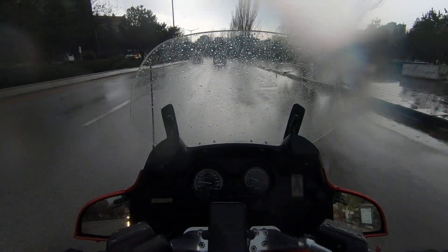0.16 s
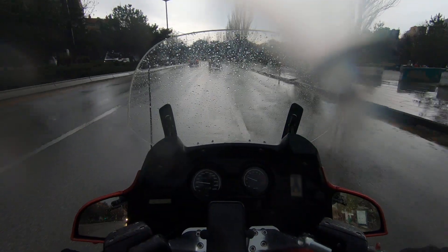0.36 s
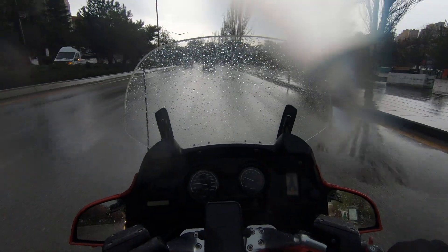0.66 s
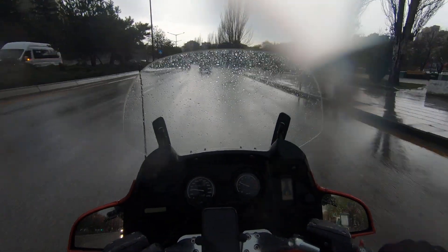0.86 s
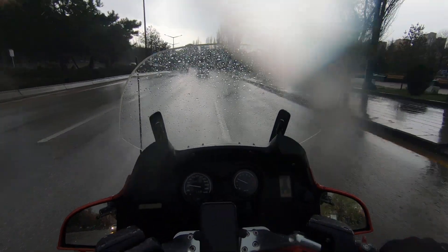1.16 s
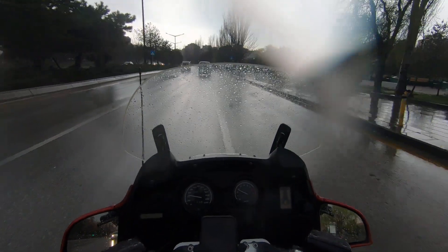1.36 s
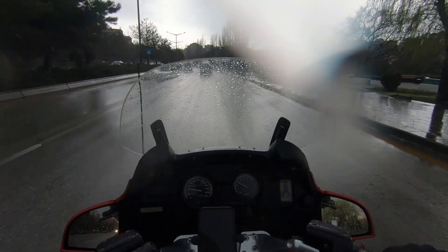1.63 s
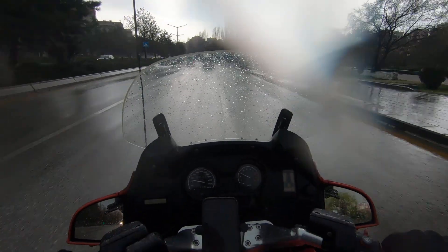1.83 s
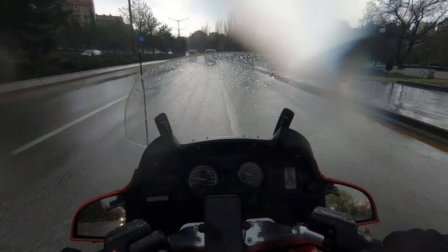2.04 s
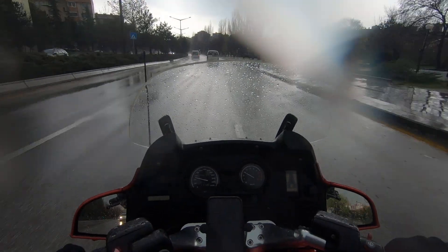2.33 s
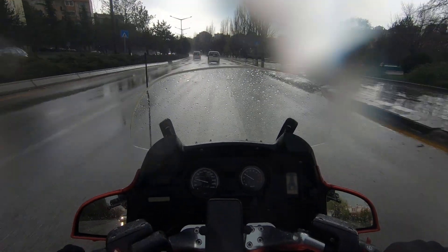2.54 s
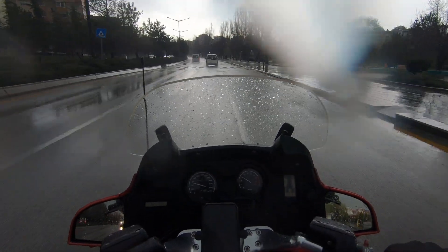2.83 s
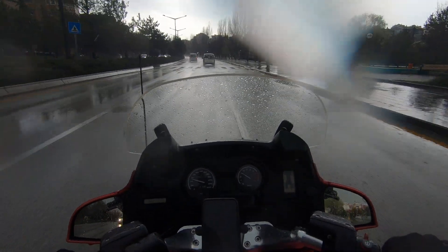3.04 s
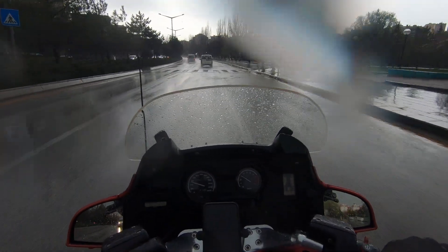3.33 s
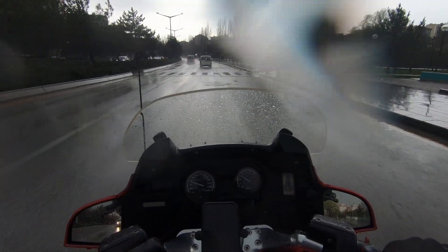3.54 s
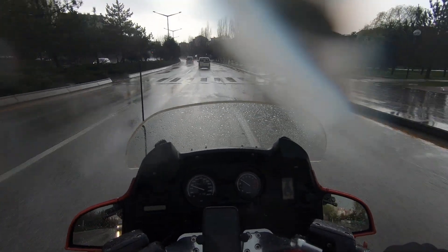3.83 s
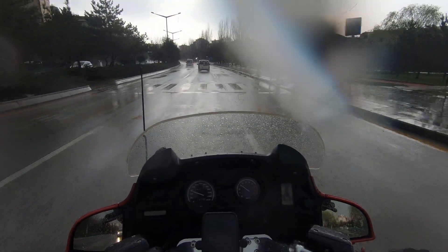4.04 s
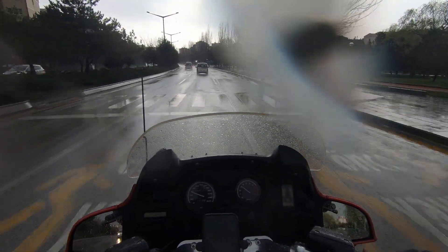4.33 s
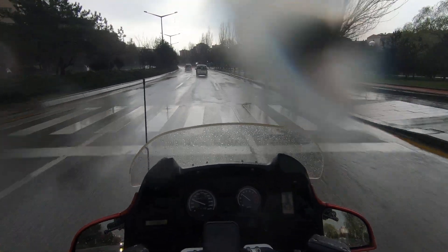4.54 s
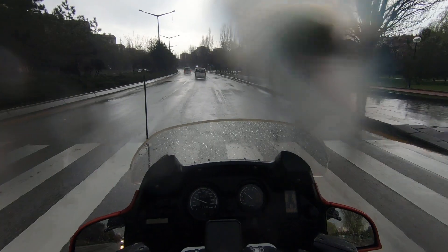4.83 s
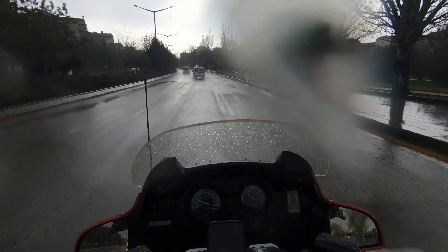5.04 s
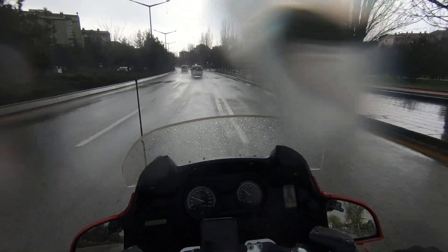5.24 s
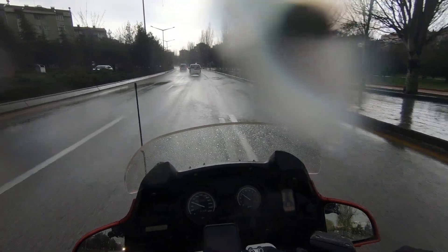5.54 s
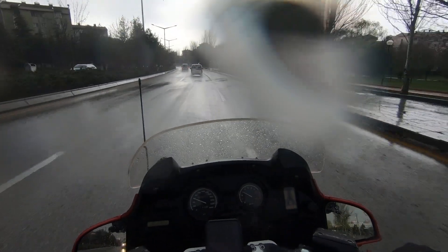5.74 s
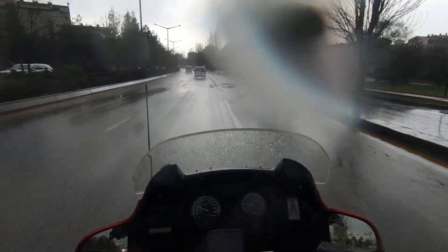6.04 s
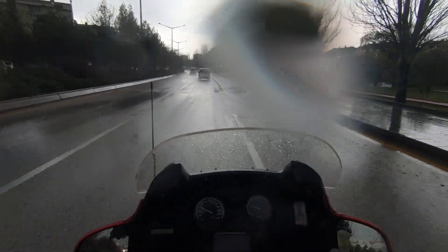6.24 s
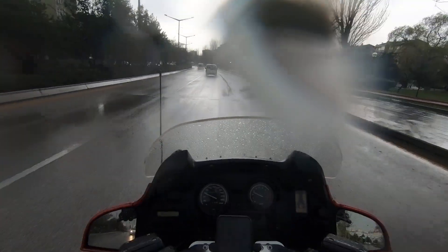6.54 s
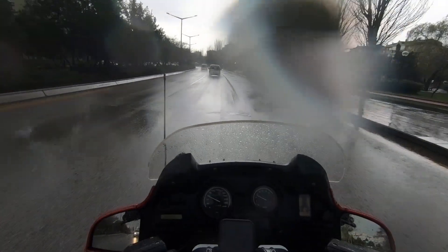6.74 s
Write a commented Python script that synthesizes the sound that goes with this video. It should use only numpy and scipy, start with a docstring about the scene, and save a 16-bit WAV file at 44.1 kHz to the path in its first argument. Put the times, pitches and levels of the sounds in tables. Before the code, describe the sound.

Outdoors on a rain-soaked street, heard from a motorcyclist's camera. Bassy gusts thump, flap and rasp right on the microphone, first in irregular knocks with small gaps, later as a steady rumble with hard slaps. A steady engine drone climbs slightly in pitch under it, with thin gear whine and wet tyre hiss. Small drops click sharply; a few fat ones knock dully on plastic. Water swishes twice near the middle.

```python
"""Wind buffets the microphone of a camera on a touring motorcyclist, in separate gusts, then steadily.
The windscreen is lowering on a rain-soaked road: eddies thump, flap and tear as shaped noise and single kicks.
Behind the wind the engine hums on firing pulses, gathering speed gently, and the gears whine as sine tones.
The tyres hiss through the water as filtered noise, with two swells of thrown standing water.
On the camera itself raindrops tick, as rings of its housing, and fat ones knock on plastic nearby."""
import sys
import numpy as np
from scipy import signal
from scipy.fft import rfft, irfft, next_fast_len
from scipy.io import wavfile
from scipy.ndimage import uniform_filter1d

SR = 44100
rng = np.random.default_rng(int(sys.argv[2]) if len(sys.argv) > 2 else 0)


def unload_wav(signal):
    """Save mono or channel-first audio to the path in sys.argv[1] as 16-bit WAV at rate SR, clipped to [-1, 1]."""
    wavfile.write(
        sys.argv[1],
        SR,
        np.round(np.clip(np.atleast_2d(signal).T, -1, 1) * 32767).astype(np.int16),
    )


N = 303252
TIME = np.arange(N) / SR  # seconds


def undb(db):
    """Decibels to gain."""
    return 10 ** (np.asarray(db) / 20)


def unit(x):
    """Scale to an rms of one."""
    return x / np.sqrt(np.mean(x ** 2))


def curves(table):
    """The columns of a table, joined by straight lines in time."""
    s, *columns = np.transpose(table)
    return [np.interp(TIME, s, column) for column in columns]


def colour(x, points):
    """Causal minimum-phase filter with the given (frequency [Hz], level [dB]) response."""
    size = next_fast_len(N + SR // 2, True)
    hz, db = np.transpose(points)
    bin_hz = np.fft.rfftfreq(size, 1 / SR) + 1  # the added 1 Hz avoids log(0)
    log_gain = np.log(undb(np.interp(np.log(bin_hz), np.log(hz), db)))
    # folding the cepstrum onto positive times makes the filter causal
    cepstrum = irfft(log_gain, size)
    cepstrum[1:size // 2] *= 2
    cepstrum[size // 2 + 1:] = 0
    response = np.exp(rfft(cepstrum))
    return irfft(rfft(x, size) * response, size)[:N]


def walk(rate):
    """Smooth random curve of rms one that changes about rate times a second."""
    grid_hz, size = 2000, 16384
    hz = np.fft.rfftfreq(size, 1 / grid_hz)
    slow = irfft(rfft(rng.standard_normal(size)) / (1 + (2 * hz / rate) ** 2))
    return unit(np.interp(TIME, np.arange(len(slow)) / grid_hz, slow))


def patter(rate, spread_db):
    """Impulses of either sign at random moments, rate a second on average, uneven in size."""
    hit = rng.random(N) < rate / SR
    sign = np.sign(rng.standard_normal(N))
    size_db = spread_db * np.clip(rng.standard_normal(N), -2, 2)
    return hit * sign * undb(size_db)


def even(x, span_s):
    """Hold the rms over span_s near one, keeping the faster flutter."""
    size = max(int(span_s * SR), 2)
    power = uniform_filter1d(uniform_filter1d(x ** 2, size), size)
    return x / np.sqrt(power + 1e-12)


def add(track, s, sound):
    """Mix a short sound into a track at s seconds."""
    part = track[int(s * SR):][:len(sound)]
    part += sound[:len(part)]


def gust(start_s, length_s, attack_s=0.013, sag_db_per_s=21):
    """A gust swells quickly, sags while it covers the microphone, then dies away, the long ones more slowly."""
    first = int(start_s * SR)
    span = slice(max(first - SR // 20, 0), first + SR // 2)
    age = TIME[span] - start_s
    rise = np.clip(age / attack_s + .5, 0, 1)
    sag = undb(sag_db_per_s * (length_s / 2 - np.clip(age, 0, length_s)))  # 0 dB at mid-gust
    release_s = 0.0058 + 0.14 * length_s
    return span, rise * sag * np.exp(-np.maximum(age - length_s, 0) / release_s)


# steady air past the microphone, before wind()'s trims:
# (time [s], buffeting level [dB], flapping level [dB], tearing level [dB])
STEADY_FLOW = [(0, -26, -31.5, -43.5), (.3, -28, -42.5, -65), (.65, -38, -41.5, -50),
               (1.0, -27.5, -35, -37), (1.2, -30, -38, -46), (1.72, -26, -35, -41.5), (2.2, -27, -29, -45),
               (2.45, -22.5, -29.5, -44.5), (2.7, -25, -30, -41.5), (2.88, -25.5, -27, -38),
               (3.1, -21, -26, -35.5), (3.5, -19.5, -24.5, -40.5), (3.82, -20, -29.5, -44.5),
               (4.05, -27, -29, -32), (4.2, -21.5, -27.5, -32.5), (4.35, -23, -24.5, -32.5),
               (4.55, -25, -28, -32), (5.05, -23.5, -26.5, -33.5), (5.33, -21, -26.5, -31.5),
               (5.75, -22.5, -29, -33.5), (6.03, -25, -28.5, -36), (6.43, -21.5, -28.5, -33.5),
               (6.62, -19.5, -29.5, -32), (6.88, -19.5, -30, -33)]
# gusts round the windscreen, before the same trims:
# (start [s], length [s], thump level [dB], tearing level [dB])
SCREEN_GUSTS = [(0.166, 0.013, -18, -36), (0.461, 0.068, -17, -38.5), (0.735, 0.074, -20, -34.5),
                (0.827, 0.021, -14, -29.5), (0.879, 0.016, -15.5, -34), (0.928, 0.054, -20, -43),
                (0.972, 0.019, -18.5, -31), (1.073, 0.013, -15, -50), (1.217, 0.041, -19, -64),
                (1.36, 0.042, -20, -34.5), (1.419, 0.059, -22, -28), (1.502, 0.026, -21.5, -31.5),
                (1.622, 0.049, -23, -44), (1.777, 0.044, -17.5, -35.5), (1.895, 0.045, -22, -36),
                (2.042, 0.14, -21, -39.5), (2.114, 0.014, -28, -38), (2.161, 0.09, -21.5, -38.5),
                (2.332, 0.02, -22.5, -36), (2.721, 0.0069, -17.5, -43), (3.926, 0.022, -20.5, -31.5),
                (4.256, 0.16, -24, -51), (4.773, 0.077, -22, -31.5), (4.896, 0.0055, -33, -27.5),
                (5.148, 0.075, -34, -27.5), (5.213, 0.05, -21, -29), (5.395, 0.03, -23, -30),
                (5.79, 0.043, -19.5, -52), (5.832, 0.032, -23, -32), (6.176, 0.11, -23.5, -34),
                (6.497, 0.02, -40, -34)]
# brief changes of the wind's level, nearly all of them lulls: (middle [s], length [s], level change [dB])
LEVEL_CHANGES = [(0.324, 0.062, -3), (0.813, 0.036, -5.5), (0.956, 0.048, -4), (1.192, 0.098, -3.5),
                 (1.726, 0.064, -9), (2.446, .07, -2), (2.552, 0.031, -5), (2.874, 0.046, -1.5),
                 (3.278, .06, -6.5), (4.091, 0.064, -2), (4.569, .06, -4), (5.063, 0.046, -3.5),
                 (5.548, 0.099, -0.5), (5.774, 0.037, -5), (6.032, 0.069, -2), (6.37, 0.033, -2.5),
                 (6.442, 0.1, -4), (6.819, 0.026, 0.5)]


def airflow(flap_share=0.33, flap_offset_db=-0.5, tearing_change=1.5):
    """Levels in dB of large, middling and small eddies: steady flow plus gust power, then brief level changes."""
    power = undb(curves(STEADY_FLOW)) ** 2
    for s, length_s, thump_db, tear_db in SCREEN_GUSTS:
        span, shape = gust(s, length_s)
        # a gust's flapping is set by its thump and its tearing
        flap_db = thump_db + flap_share * (tear_db - thump_db) + flap_offset_db
        power[:, span] += np.outer(undb([thump_db, flap_db, tear_db]), shape) ** 2
    change_db = np.zeros(N)
    for s, length_s, db in LEVEL_CHANGES:
        add(change_db, s - length_s / 2, db * signal.windows.tukey(int(length_s * SR), .7))
    # the small eddies change tearing_change times as much, in dB
    return 10 * np.log10(power) + np.outer([1, 1, tearing_change], change_db)


# spectrum of the large eddies, which thump: (frequency [Hz], relative level [dB per Hz])
THUMP_SPECTRUM = [(12, -18.5), (28, -1), (52, 4), (90, 4), (140, -2.5), (200, -16), (400, -39), (800, -84)]
# spectrum of the middling eddies, which flap: (frequency [Hz], relative level [dB per Hz])
FLAP_SPECTRUM = [(60, -26.5), (110, 0), (160, 0.5), (240, -2), (330, -9.5), (480, -21), (900, -51),
                 (2000, -85)]
# spectrum of the small eddies, which tear: (frequency [Hz], relative level [dB per Hz])
TEAR_SPECTRUM = [(120, -21), (250, 2), (370, 4.5), (500, 1.5), (800, -5.5), (1200, -13), (1800, -22.5),
                 (2800, -43.5), (4500, -41), (6000, -60.5), (10000, -79)]
# extra edge of the fastest air: (frequency [Hz], relative level [dB per Hz])
EDGE_SPECTRUM = [(400, -31), (900, 14), (1500, 5), (2000, -4), (3000, -13.5), (4600, -23), (6000, -40.5),
                 (10000, -58)]


def wind(edge_db=-13, gust_db=-30, edge_growth=2.6):
    """Large eddies thump the microphone; smaller ones flap and tear past in bursts that ride on the thumps."""
    buffet_db, flap_db, tearing_db = airflow()
    flutter = walk(66)
    eddies = unit(patter(900, 1.3)) * undb(1.5 * flutter)
    buffet = even(colour(eddies, THUMP_SPECTRUM), 0.035)
    middling = unit(patter(450, 4.2)) * undb(2.9 * flutter)
    flap = even(colour(middling, FLAP_SPECTRUM), 0.1)

    # push follows the short-term strength of the larger eddies
    push = np.sqrt(uniform_filter1d(buffet ** 2 + flap ** 2, SR // 250) + .5)
    grains = unit(patter(2500, 4.6)) + 0.48 * rng.standard_normal(N)
    small = grains * undb(1.4 * flutter) * push ** 0.52
    tearing = even(colour(small, TEAR_SPECTRUM), 0.029)

    # faster air sheds finer eddies, so gusts are brighter as well as louder
    fine = rng.standard_normal(N) * undb(3.7 * flutter) * push
    edge = even(colour(fine, EDGE_SPECTRUM), 0.07)
    edge *= undb(gust_db + edge_db + edge_growth * (tearing_db - gust_db))
    large = buffet * undb(buffet_db + 1.5) + flap * undb(flap_db + 3.0)
    return large + tearing * undb(tearing_db + 3.5) + edge


# engine speed: (time [s], firing rate [Hz], gear whine level [dB], exhaust hum level [dB])
ENGINE_SPEED = [(0, 86.9, -56, -33.5), (.6, 89.28, -47, -35.5), (1.2, 93.28, -44, -37.5),
                (1.55, 95.33, -41.5, -33.5), (2.0, 97.96, -45, -35), (2.4, 99.47, -48, -38.5),
                (3, 104.4, -46, -32), (3.35, 106.3, -40.5, -36), (3.75, 108, -40.5, -39),
                (4.05, 108.9, -44.5, -33), (4.45, 110.3, -42, -38), (4.8, 113, -53, -36.5),
                (5.5, 113.6, -57.5, -27), (6.88, 118.2, -57.5, -36)]
# exhaust note: (frequency [Hz], relative level [dB])
EXHAUST_NOTE = [(30, -17), (60, -4), (90, 12.5), (175, -21.5), (270, -19.5), (420, -14), (650, -43.5),
                (1100, -23.5), (2000, -66.5), (5000, -83.5)]
# gear tones: (multiple of the firing rate, level against the gear whine [dB])
GEAR_TONES = [(7.27, -7), (10.82, -12), (12.56, -3), (12.77, -11), (25.12, -26.5)]
# drone of the crankcase and valve train: (multiple of the firing rate, peak level before wavering [dB])
CRANKCASE_DRONE = [(3, -43), (3.5, -46.5), (4, -47), (4.5, -48), (5, -48.5), (6, -54), (8, -54.5),
                   (12, -54.5), (16, -60), (25.5, -69)]


def engine(waver_db=0.9):
    """Even firings hum through the exhaust; the crankcase drones and the gears sing at fixed multiples of them."""
    firing_hz, whine_db, hum_db = curves(ENGINE_SPEED)
    turns = np.cumsum(firing_hz * (1 + 0.00077 * walk(23))) / SR  # firings so far
    pulses = np.diff(np.floor(turns), prepend=0) * undb(1.4 * walk(120))

    def tones(table):
        """Moving air between the engine and the microphone makes each tone waver."""
        total = np.zeros(N)
        for multiple, db in table:
            gain = undb(db + waver_db * walk(22))
            total += gain * np.sin(2 * np.pi * multiple * turns + .15 * walk(40))
        return total

    hum = undb(hum_db) * unit(colour(pulses, EXHAUST_NOTE))
    return hum + undb(whine_db) * tones(GEAR_TONES) + tones(CRANKCASE_DRONE)


# upper sizzle of the tyre spray, before a half-decibel lift: (time [s], level [dB])
SIZZLE_LEVEL = [(0, -56.5), (.35, -56.5), (.65, -58), (1.35, -59), (1.6, -56), (2.1, -58), (2.8, -59),
                (3.1, -56.5), (3.45, -58), (3.65, -60), (4.4, -59), (5, -56.5), (5.53, -57.5), (6.05, -59),
                (6.3, -58.5), (6.88, -56)]
# lower roar of the tyres on the wet road, on the scale of the sizzle's rms: (time [s], level [dB])
ROAR_LEVEL = [(0, -51.5), (.6, -49.5), (1, -50), (1.8, -51.5), (2.5, -55.5), (3.4, -51.5), (4.5, -53),
              (6.88, -57.5)]
# wet tyre hiss as it reaches the sealed microphone: (frequency [Hz], relative level [dB per Hz])
TYRE_HISS = [(300, 16.5), (480, 13.5), (780, 9), (1100, 15), (1380, 14), (1750, 2.5), (2350, 4.5),
             (2950, 0), (3400, 2.5), (3850, 4.5), (4700, 4.5), (5200, -2.5), (5900, -17), (7800, -19),
             (11000, -48.5)]


def tyres():
    """Fine spray torn from the water film; its lower roar and upper sizzle waver separately."""
    sizzle_db, = curves(SIZZLE_LEVEL)
    roar_db, = curves(ROAR_LEVEL)
    droplets = rng.standard_normal(N) + 0.78 * unit(patter(3000, 2.3))
    hiss = colour(droplets, TYRE_HISS)
    highpass = signal.butter(4, 3200, "high", fs=SR, output="sos")
    sizzle = signal.sosfiltfilt(highpass, hiss)
    roar = (hiss - sizzle) * undb(roar_db + 2.0 * walk(5.9))
    spray = roar + sizzle * undb(sizzle_db + 0.5 + 0.46 * walk(40))
    return spray / np.std(sizzle)


# lone large eddies that thump without rasping: (time [s], push level before trim [dB], pitch [Hz])
LONE_EDDIES = [(0.026, -8.5, 100.5), (0.116, -16, 140), (0.191, -4, 130), (0.259, -15, 170),
               (0.368, -9.5, 143), (0.407, -9.5, 122), (0.441, -7.5, 128), (1.089, -8.5, 75),
               (1.129, -12.5, 140), (1.262, -10, 112), (1.644, -9, 135), (1.791, -12, 115),
               (1.811, -15, 110.3), (1.897, -9.5, 115), (1.945, -10.5, 124), (1.994, -11, 109.6),
               (2.064, -9.5, 150), (2.172, -9.5, 152), (2.252, -6.5, 175), (2.288, -9, 135),
               (2.344, -8.5, 131), (2.692, -11, 129.4), (4.914, -7, 130), (5.249, -10, 129),
               (5.878, -12, 150), (6.082, -7, 125)]


def thumps(trim_db=-1, skew=0.48):
    """A lone eddy crosses the port: suction, a steep push, suction again."""
    out, lead_s = np.zeros(N), 1 / 50
    age = TIME[:SR // 25] - lead_s
    for s, db, hz in LONE_EDDIES:
        u = np.pi * hz * age
        pressure = (1 - 2 * u ** 2 - skew * u) * np.exp(-u ** 2)
        add(out, s - lead_s, undb(db + trim_db) * pressure)
    return out


def puffs(envelope, spectrum):
    """Crackling bursts of turbulence with the given rms envelope and colour."""
    air = even(patter(3000, 6.6) + 0.37 * rng.standard_normal(N), 0.0034)
    return colour(air * envelope, spectrum) / np.std(colour(air, spectrum))


# single hard eddies that slap the microphone:
# (time [s], reference level [dB], tearing against it [dB], rasp against it [dB])
HARD_EDDIES = [(0.167, -11.5, -9, -20), (.187, -16, -7, -28), (.436, -23.5, 1.5, -17),
               (0.469, -15.5, -1.5, -21), (.503, -9, -11, -20), (0.747, -20, -2, -11),
               (0.765, -14, -2, -13), (0.79, -20, -5.5, -10), (0.829, -15, -9, -14),
               (0.845, -13.5, -13.5, -13), (.875, -15, -8, -13), (0.921, -19.5, -4.5, -17),
               (1.024, -6.5, -15.5, -20.5), (1.376, -15.5, -5.5, -14), (1.427, -19, 1.5, -9.5),
               (1.459, -9.5, -13, -17), (2.114, -21, -5, -10.5), (2.372, -19, -1.5, -22.5),
               (2.605, -15.5, -5.5, -25), (2.722, -17, -4.5, -19), (2.899, -22, 2.5, -18),
               (3.504, -18.5, -10.5, -8), (3.529, -14.5, -5, -27.5), (3.654, -16.5, -9.5, -11.5),
               (3.896, -18, -2.5, -13.5), (3.936, -18.5, -4, -10), (3.95, -15, -3.5, -17.5),
               (4.338, -20, -1.5, -5.5), (4.386, -18, -0.5, -16.5), (4.764, -16.5, -3, -18.5),
               (4.85, -17, -3, -8.5), (5.103, -14.5, -4.5, -24.5), (5.153, -14.5, -5.5, -12),
               (5.18, -7.5, -4, -12), (5.19, -20.5, -5, -5.5), (5.838, -17.5, -2.5, -15),
               (5.852, -20, 0.5, -10.5), (5.898, -20.5, 1, -18), (6.081, -17.5, -9, -15.5),
               (6.112, -16, 1, -16), (6.198, -7, -15.5, -22.5), (6.222, -19, -1.5, -8),
               (6.283, -23.5, -0.5, -14.5), (6.39, -26.5, 1.5, -20), (6.488, -20, 2.5, -23.5),
               (6.668, -16, -4, -18), (6.709, -23.5, -1.5, -13), (6.78, -19, -6, -6),
               (6.832, -22.5, 4, -20)]


def slaps(decay_s=0.0056, push_db=-3):
    """A hard eddy is one rounded pressure kick with a short, rasping burst of turbulence behind it."""
    bursts, rasps, kicks = np.zeros((3, N))
    age = TIME[:SR // 10]
    fade = np.exp(-age / decay_s)
    kick = (age / 0.0015) * np.exp(1 - age / 0.0019) * np.sin(2 * np.pi * 150 * age)
    for s, db, tear_db, rasp_db in HARD_EDDIES:
        add(bursts, s, undb(db + tear_db) * fade)
        add(rasps, s, undb(db + rasp_db) * fade)
        add(kicks, s, undb(db + push_db) * kick)
    return kicks + puffs(bursts, TEAR_SPECTRUM) + puffs(rasps, EDGE_SPECTRUM)


# raindrops on the camera: (time [s], peak level of the ring [dB], share of sharp snap [0-1])
CAMERA_DROPS = [(.212, -31.5, 0.6), (1.005, -36, 0.6), (1.472, -38, .1), (1.483, -37, 0.9),
                (2.042, -28.5, 0.43), (2.14, -36, .03), (3.517, -30, 0.2), (3.714, -34.5, .1),
                (3.951, -33, .02), (4.035, -40, .3), (4.616, -47, .15), (4.99, -38, .02), (5.386, -38, .01),
                (5.414, -36, .5), (6.444, -35, 0.32)]
# bursts of fine droplets that sprinkle the camera: (start [s], length [s], level [dB])
FINE_BURSTS = [(1.488, 0.38, -55), (4.59, .04, -53), (4.972, 0.046, -52), (5.17, 0.086, -53),
               (5.493, 0.075, -49), (5.647, .09, -57), (5.83, 0.061, -53), (6.15, 0.28, -54)]
# modes of the camera housing: (frequency [Hz], time to fall 60 dB [s], relative level [dB])
HOUSING_MODES = [(3800, .014, -7.5), (4070, 0.01, 4.5), (4444, 0.013, 1.5), (4630, 0.012, -3)]
# snap of a drop right on the microphone port: (frequency [Hz], relative level [dB])
PORT_SNAP = [(1000, -32), (4000, -1.5), (6000, 10), (8500, 3), (11000, -6.5)]


def rain(contact_s=0.00045, membrane_hz=5730):
    """Drops ring the camera housing, big ones singly and fine ones in bursts; those near the port also snap."""
    hits = undb(-45) * patter(22, 2)  # faint drops throughout
    snaps, sprinkle = np.zeros((2, N))
    for s, db, snap in CAMERA_DROPS:
        hits[int(s * SR)] += undb(db)
        snaps[int(s * SR)] += undb(db) * snap
    for s, length_s, db in FINE_BURSTS:
        add(sprinkle, s, undb(db) * signal.windows.tukey(int(length_s * SR), .5))

    age = TIME[:SR // 20]
    ring = np.zeros(len(age))
    for hz, t60, db in HOUSING_MODES:
        ring += undb(db) * np.exp(-np.log(1000) * age / t60) * np.sin(2 * np.pi * hz * age)
    # a drop lands softly, and the waterproof membrane passes little above the housing modes
    ring *= 1 - np.exp(-age / contact_s)
    ring = signal.sosfilt(signal.butter(10, membrane_hz, fs=SR, output="sos"), ring)
    drops = signal.fftconvolve(hits, ring / np.abs(ring).max())[:N]
    spatter = sprinkle * unit(signal.fftconvolve(patter(1300, 1.6), ring)[:N])
    return drops + spatter + undb(3.0) * colour(snaps, PORT_SNAP)


# fat drops that knock on the plastic nearby: (time [s], level before softening and damping [dB], pitch [Hz])
FAT_DROPS = [(1.005, -21, 1725), (2.117, -24, 1500), (3.516, -21.5, 2180), (3.617, -21.5, 1987),
             (3.654, -16, 1620)]


def knocks(decay_s=0.0012, contact_s=0.0013):
    """A fat drop gives one dull, quickly damped knock."""
    out, age = np.zeros(N), TIME[:SR // 20]
    shape = (1 - np.exp(-age / contact_s)) * np.exp(-age / decay_s)
    for s, db, hz in FAT_DROPS:
        add(out, s, undb(db) * shape * np.sin(2 * np.pi * hz * age))
    return signal.sosfilt(signal.butter(4, 3500, fs=SR, output="sos"), out)


# eddies shed in step off the edge of the lowering screen: (time [s], mean rate [Hz], level [dB])
SCREEN_EDDIES = [(2.85, 174.9, -39), (3.0, 165, -27), (3.18, 151.2, -23), (3.33, 134.4, -29),
                 (3.46, 98.66, -16), (3.53, 93, -23), (3.62, 136.8, -37.5), (3.72, 144.1, -25),
                 (3.79, 112.7, -15.5), (3.89, 86, -18.5), (3.95, 79.4, -28), (4.02, 81.2, -53)]


def shedding(jitter=.04, overtone_db=-12, waver_db=3.0):
    """While the screen's wake sweeps over the microphone, its eddies line up into a rough growl, gliding in pitch."""
    rate_hz, level_db = curves(SCREEN_EDDIES)
    phase = 2 * np.pi * np.cumsum(rate_hz * (1 + jitter * walk(63))) / SR
    tone = np.sin(phase) + undb(overtone_db) * np.sin(2 * phase)
    growl = unit(tone * undb(waver_db * walk(42)))
    return growl * undb(level_db)


# a wheel runs through standing water: (time [s], level before wavering [dB], centre of the swish [Hz])
STANDING_WATER = [(3.28, -69, 1600), (3.37, -49, 1893), (3.4, -48, 2200), (3.428, -44.5, 2700),
                  (3.447, -47, 3100), (3.48, -53, 3145), (3.51, -51, 2895), (3.56, -60, 2022),
                  (3.7, -56, 1736), (3.8, -50, 1750), (3.88, -46.5, 1747), (4, -77, 1736)]
# colour of its swish: (frequency [Hz], relative level [dB per Hz])
SWISH_SPECTRUM = [(600, -25.5), (1700, 13), (2800, -1), (3800, -1.5), (5000, -10), (6000, -25),
                  (11000, -50.5)]


def puddle(width_hz=620):
    """Two swells of thrown water, noise on a gliding sine: the first rises in pitch and falls, the second stays low."""
    swish_db, centre_hz = curves(STANDING_WATER)
    band = colour(rng.standard_normal(N), [(width_hz, 0), (2 * width_hz, -11), (6000, -42)])
    swish = band * np.sin(2 * np.pi * np.cumsum(centre_hz) / SR)
    return even(colour(swish, SWISH_SPECTRUM), 0.054) * undb(swish_db + 2 * walk(40))


def scene():
    """Wind in front at the microphone, machine and water behind it."""
    air = wind() + shedding() + slaps() + thumps()
    machine_and_road = engine() + tyres() + puddle()
    return (air + machine_and_road + rain() + knocks())[None]


def record(dry, limit=.62, top_hz=11000):
    """The camera rounds the very highest pressure peaks and cuts the top."""
    # only the bass is large enough to reach the limit
    bass = signal.sosfiltfilt(signal.butter(2, 900, fs=SR, output="sos"), dry)
    rounded_bass = bass / (1 + (bass / limit) ** 4) ** .25
    rounded = dry - bass + rounded_bass
    return signal.sosfilt(signal.ellip(8, .2, 70, top_hz, fs=SR, output="sos"), rounded)


dry = scene()
out = record(dry)
unload_wav(out)
```